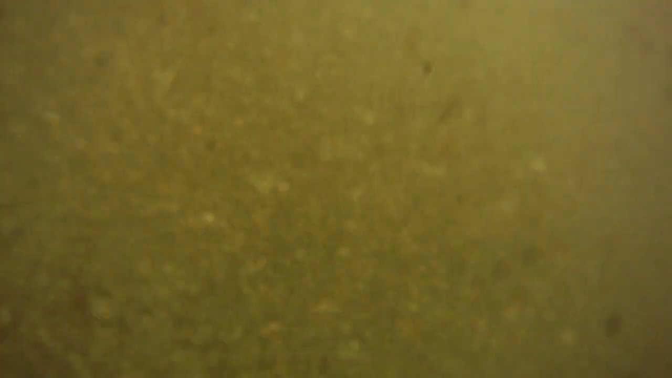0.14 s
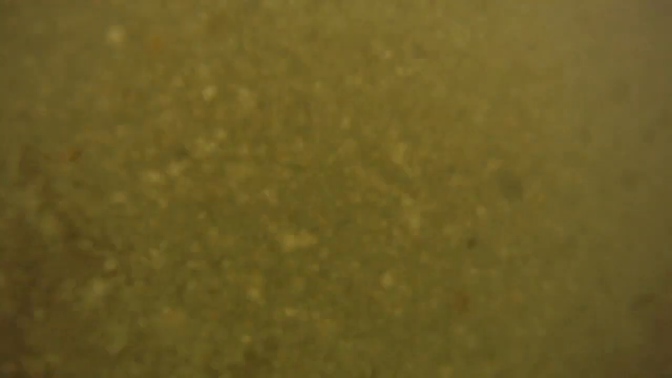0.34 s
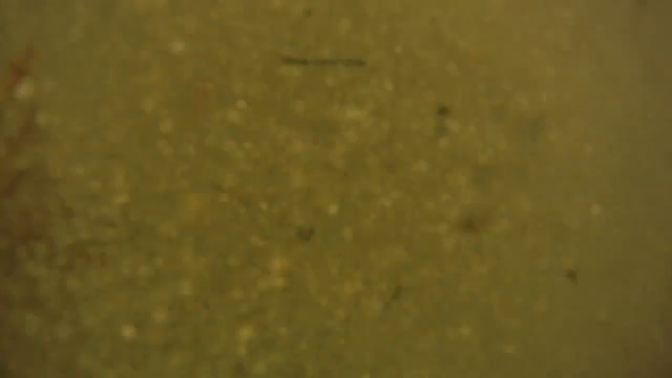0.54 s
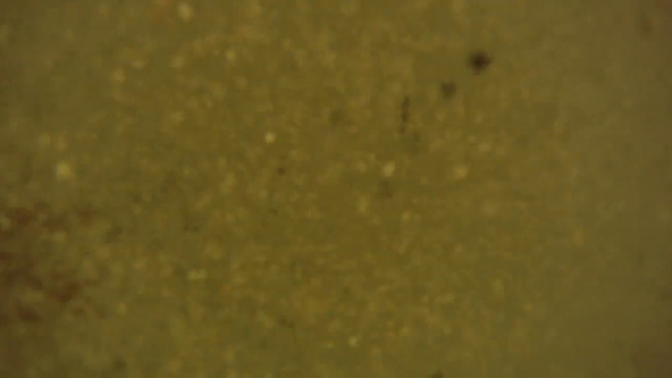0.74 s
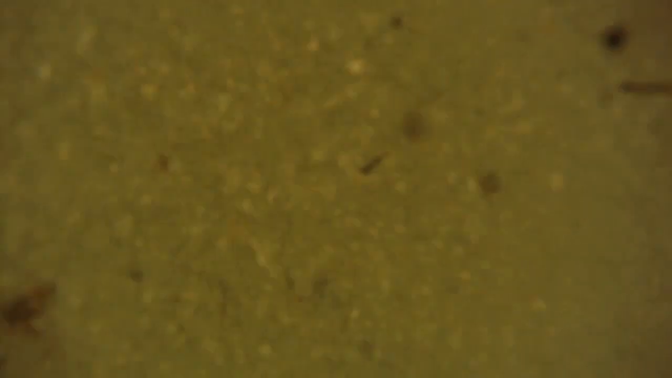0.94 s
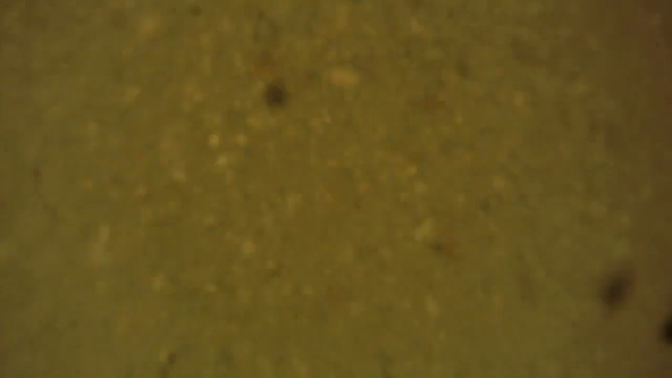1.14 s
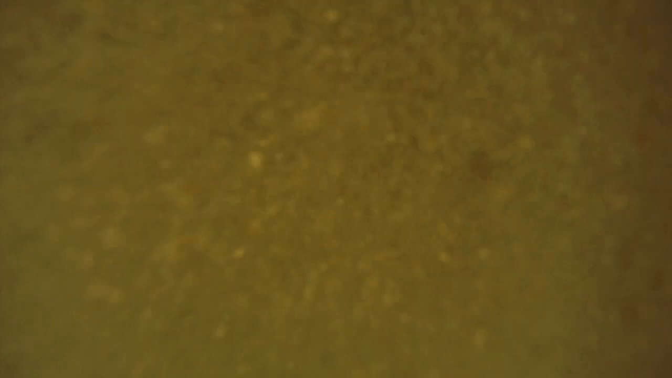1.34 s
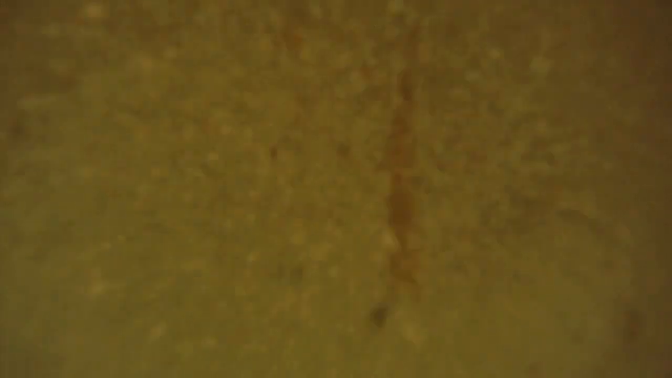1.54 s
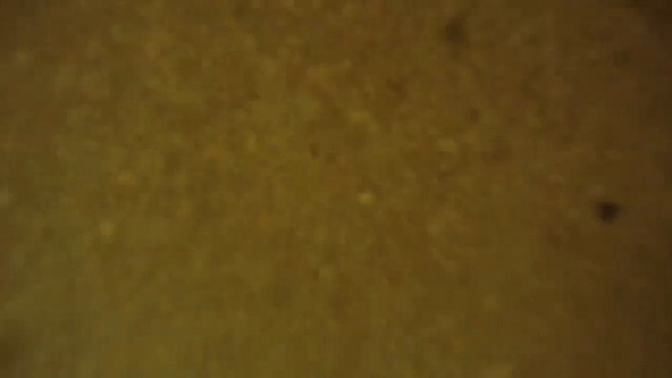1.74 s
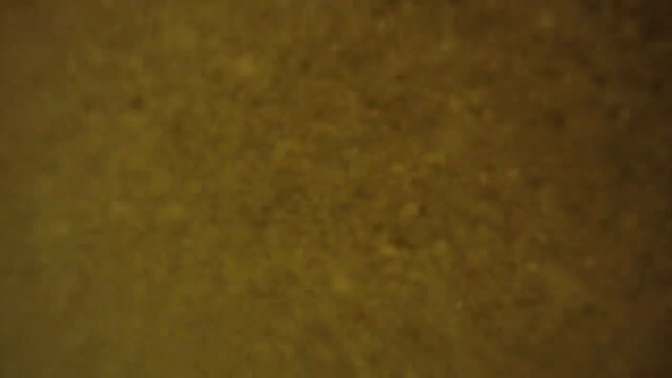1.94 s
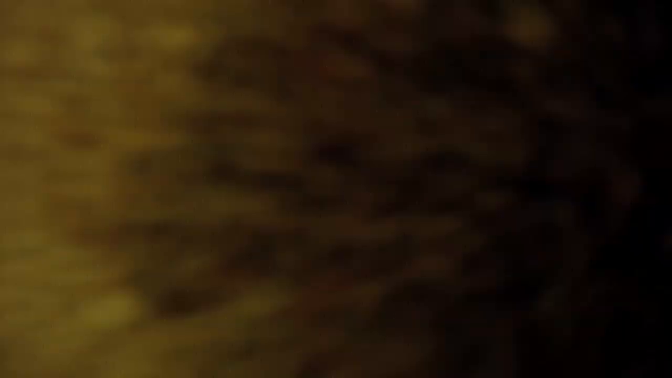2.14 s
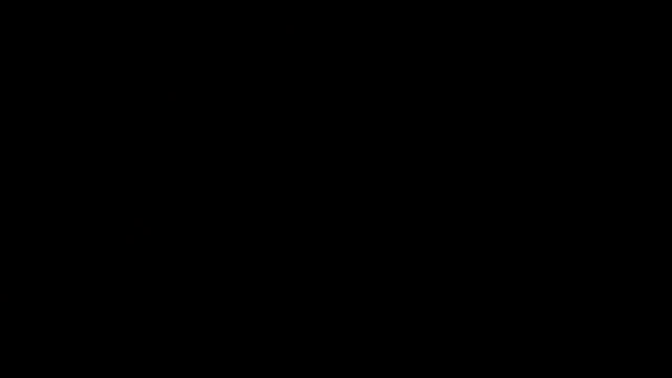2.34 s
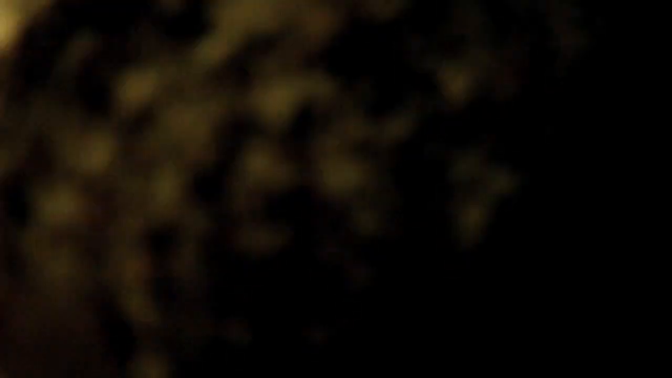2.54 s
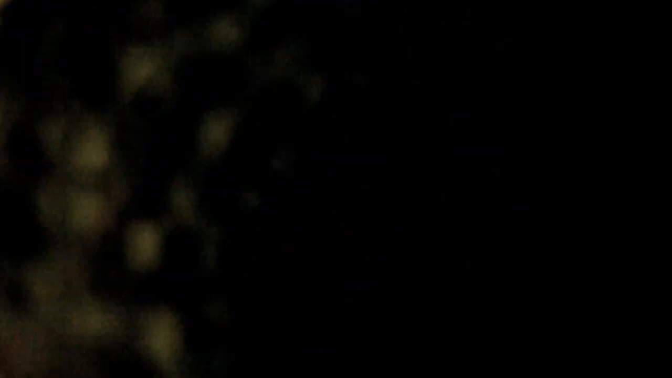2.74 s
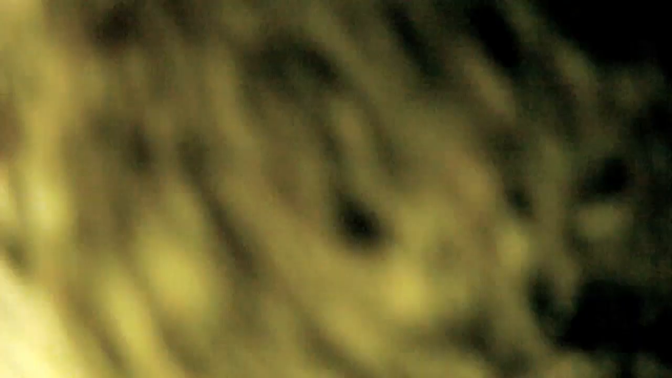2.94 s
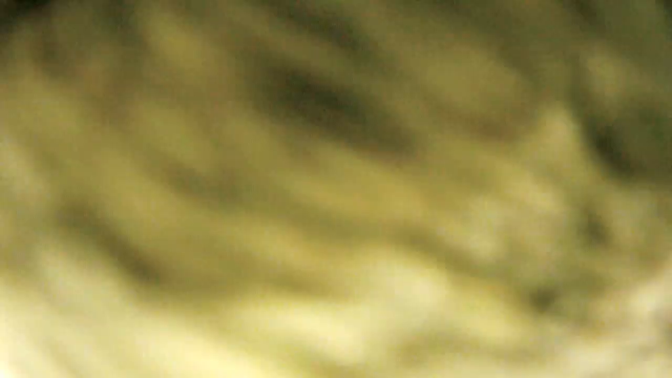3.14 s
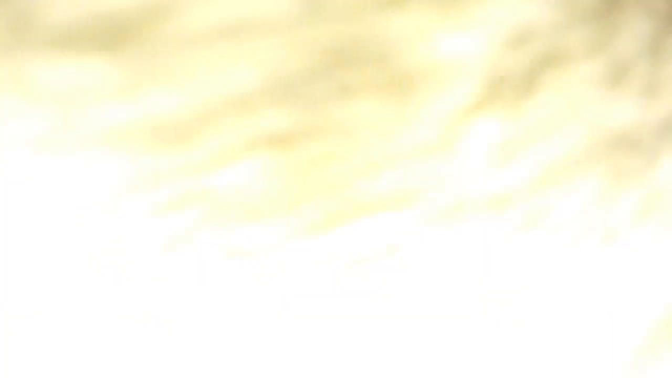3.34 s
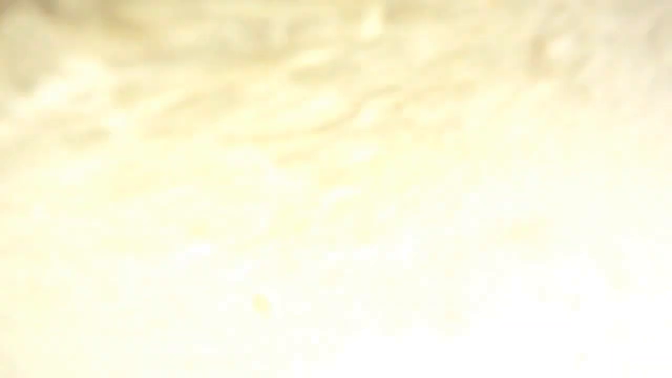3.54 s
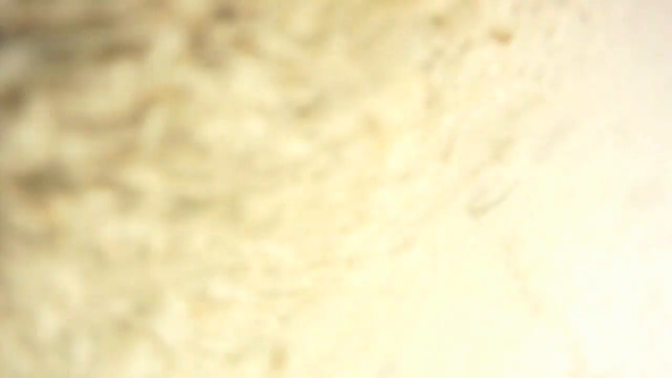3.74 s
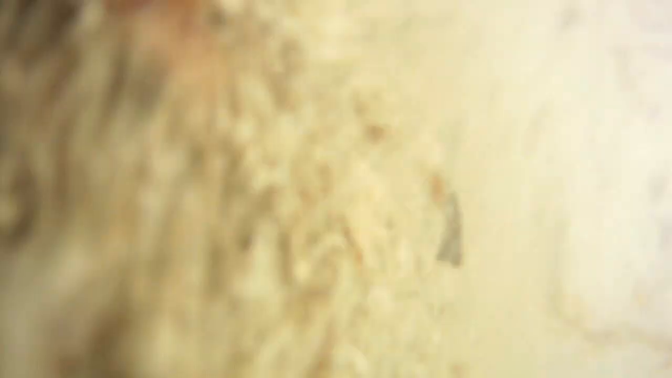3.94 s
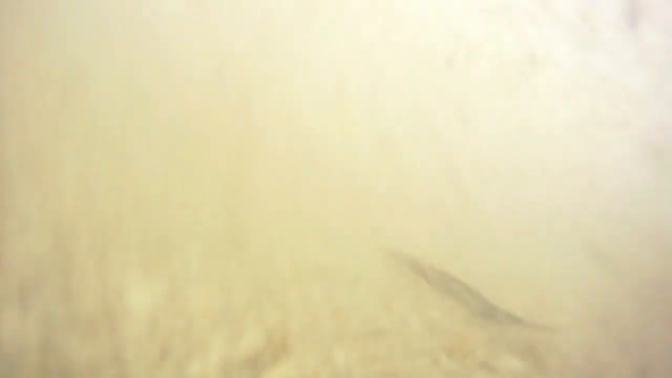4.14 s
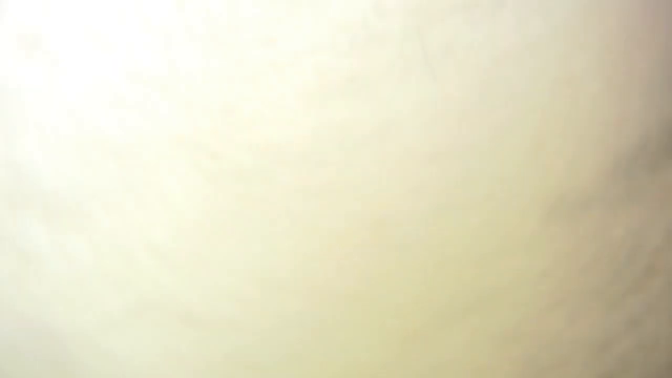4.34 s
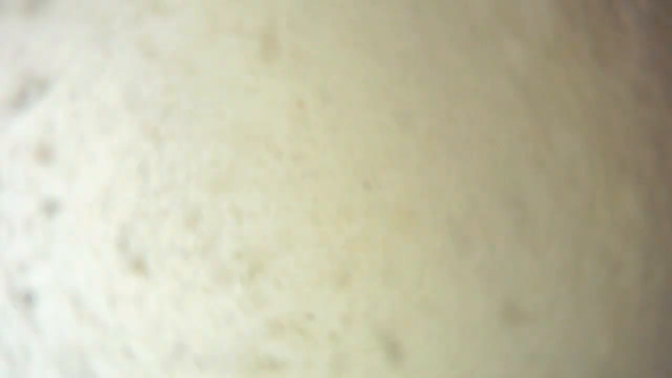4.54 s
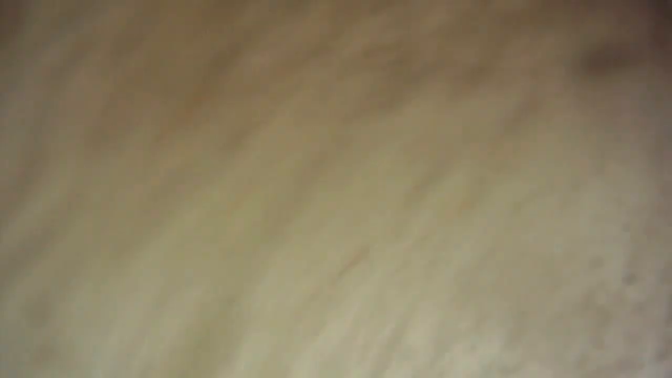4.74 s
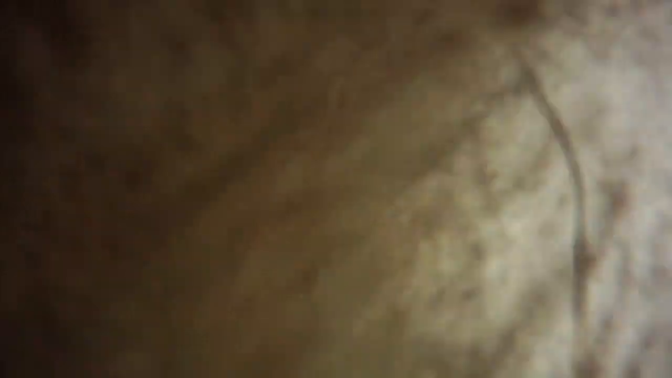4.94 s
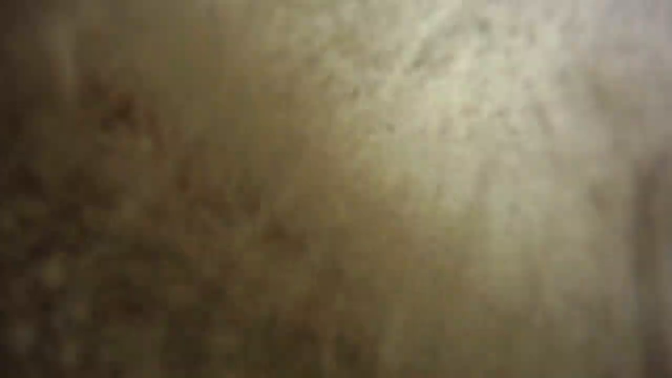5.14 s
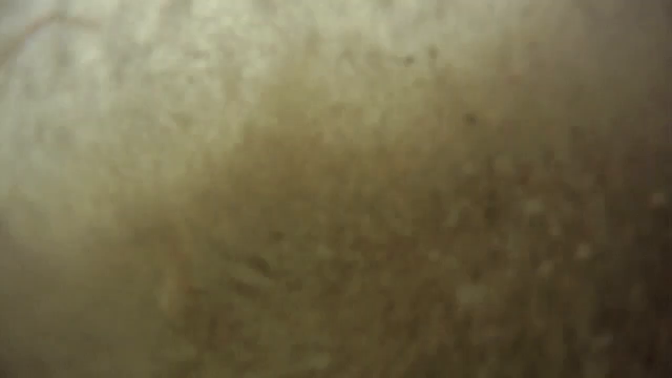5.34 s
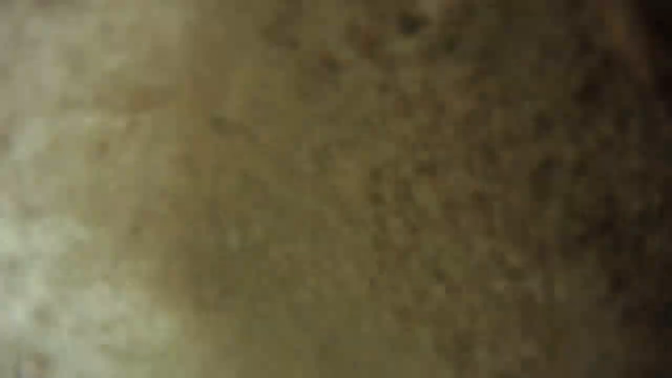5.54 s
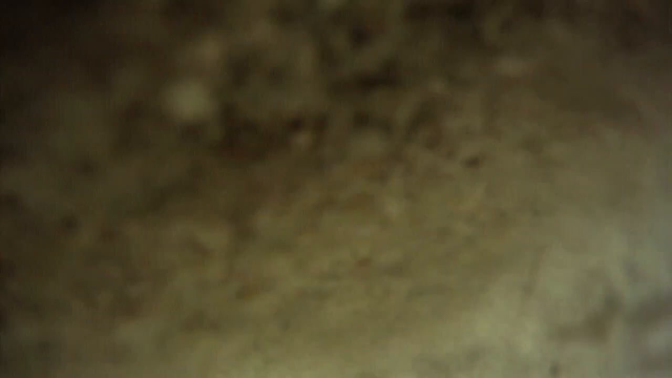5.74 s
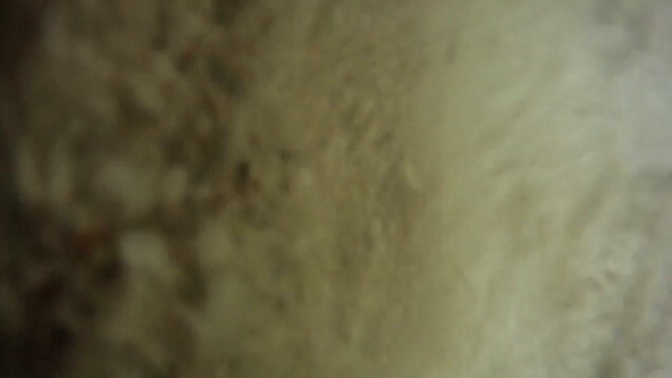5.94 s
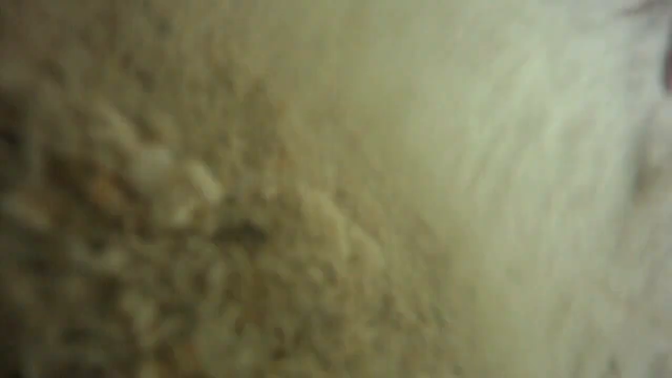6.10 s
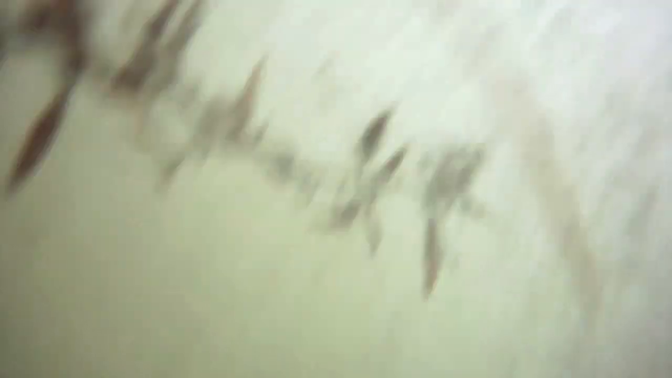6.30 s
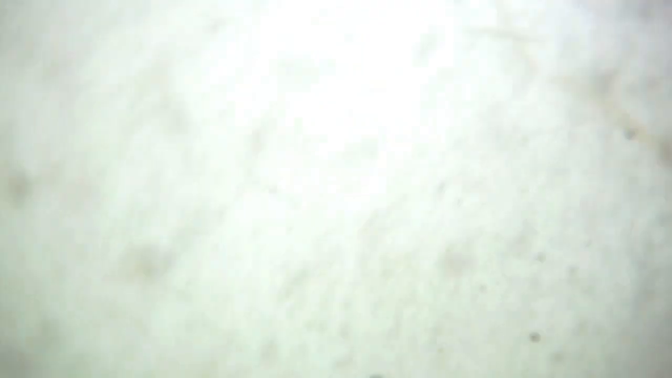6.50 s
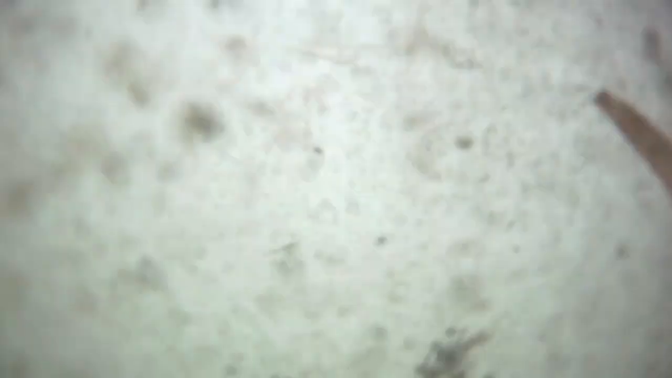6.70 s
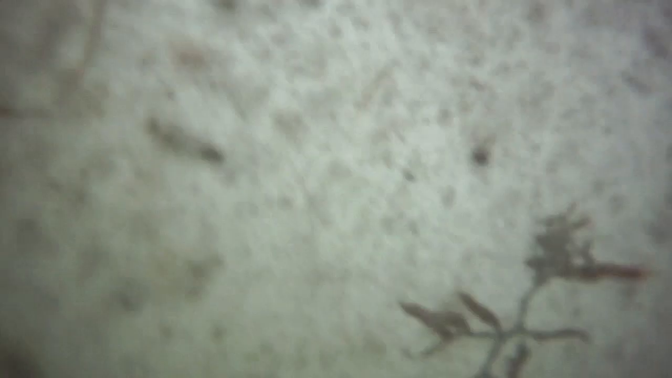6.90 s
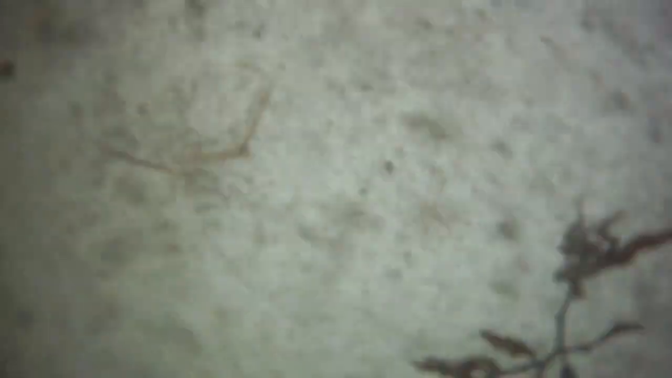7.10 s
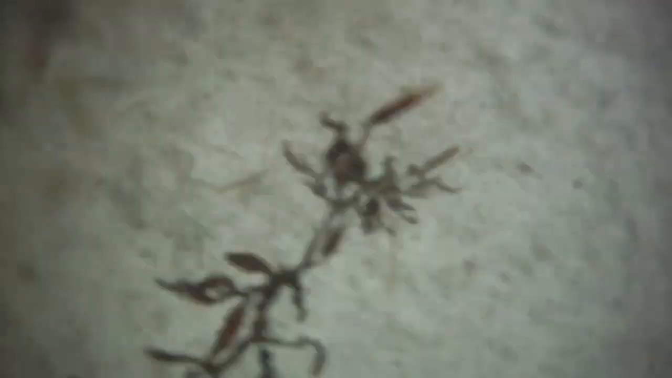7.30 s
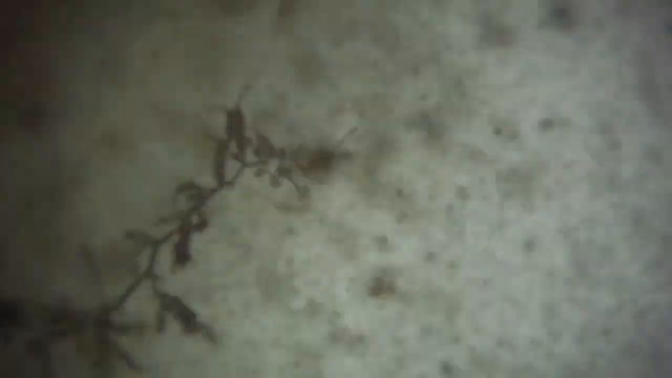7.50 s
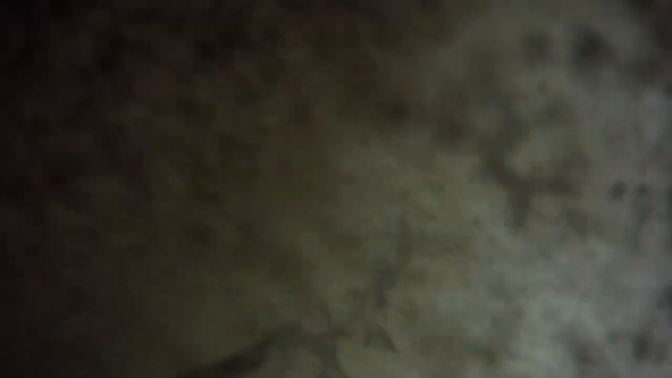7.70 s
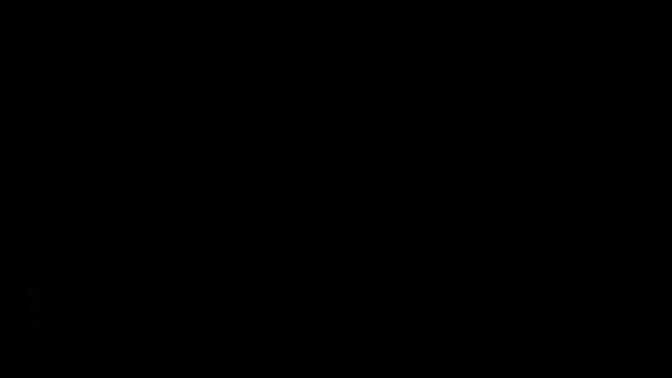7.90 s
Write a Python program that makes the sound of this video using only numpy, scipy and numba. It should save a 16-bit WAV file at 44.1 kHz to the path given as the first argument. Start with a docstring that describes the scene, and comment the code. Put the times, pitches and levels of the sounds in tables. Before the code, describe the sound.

Muffled underwater rumbling and gurgling as a plastic camera housing knocks and scrapes along sand in the surf.

```python
"""A waterproof camera housing knocks and grinds on the sand as it tumbles under the surf.
Impacts and sliding friction excite the resonant modes of its plastic shell, and grit ticks against it.
Turbulent water rumbles, gurgles and thumps through the wall; bubbles ring and fizz over a dull hiss.
The camera's gain control ducks after loud knocks, and its converter clips and holds each sample
at a low rate, which mirrors the spectrum into the treble."""
import sys
import numpy as np
from scipy import signal
from scipy.fft import rfft, irfft
from scipy.io import wavfile
from scipy.ndimage import uniform_filter1d
from numba import njit

SR = 44100
rng = np.random.default_rng(int(sys.argv[2]) if len(sys.argv) > 2 else 0)


def waveform_to_disk(signal):
    """Save audio, clipped to [-1, 1], as 16-bit WAV at the path in sys.argv[1]."""
    frames = np.transpose(np.atleast_2d(signal))
    scaled = np.clip(frames, -1, 1) * 32767
    samples = np.round(scaled).astype(np.int16)
    wavfile.write(sys.argv[1], SR, samples)


N = 355434

# turbulence round the housing: (time [s], rumble level [dB], gurgle level [dB])
WATER = [(0.0, -28.5, -30.5), (0.36, -26, -27), (0.8, -29.5, -36.5), (1.46, -39.5, -36), (2.11, -41, -35),
         (2.69, -43, -38), (2.99, -29, -36.5), (3.19, -40.5, -40.5), (3.61, -54, -40), (4.37, -47.5, -35.5),
         (4.67, -59, -43), (4.98, -60, -38.5), (5.36, -27, -29), (5.68, -42.5, -29), (6.04, -33, -33.5),
         (6.31, -38.5, -31), (6.44, -31, -22.5), (6.91, -25.5, -29), (7.02, -26.5, -25), (7.25, -39.5, -50),
         (7.56, -29, -25.5), (7.8, -31.5, -33.5), (8.06, -23, -24.5)]


def knocks():
    """Impact excitation: bursts of contact noise ring the shell and its air cavity; each push thuds."""
    # blows on the housing: (time [s], level [dB], 60 dB decay time [s], dull offset [dB], sharp offset [dB])
    blows = [(0.439, -29, .02, 0, -30), (0.523, -29, .022, -16, -27), (0.9028, -32, .03, -16, -32),
             (1.8197, -31.5, .019, -20, -10), (1.977, -36.5, .02, -22, -8), (2.218, 7, .01, -7, -1.5),
             (2.237, -6, 0.068, -6, -6), (2.5572, -39.5, .022, 4, -29), (2.858, -20, .019, 2, -6),
             (2.873, -14, 0.025, -2, -10), (2.898, -12, 0.013, -9, -13), (2.909, -21.5, .015, 7, -28),
             (3.0718, -12.5, 0.018, 4.5, -7), (3.122, -16, .016, -4, -11), (3.1625, -4.5, 0.011, -22, -9.5),
             (3.348, -12, 0.012, -23, 2.5), (3.362, -21, .022, -18, 4), (3.418, -3, 0.02, -24, -8.5),
             (3.4461, -1, .028, -3.5, -9), (3.489, -9.5, 0.016, -20, 7.5), (3.496, -0.5, .022, -30, -5),
             (3.5346, -9.5, 0.019, -0.5, 5.5), (3.541, 10, 0.018, -17, -2), (3.589, -17, 0.026, -1, -2),
             (3.6918, -20.5, 0.038, -2, -1), (3.985, 6, 0.011, -8, -36), (4.0128, 0.5, 0.02, -10, -18),
             (4.0226, -2, .038, -10, -5.5), (4.0834, 5, 0.03, -5.5, -1), (4.154, -18, .022, -18, -10),
             (4.207, -10, 0.04, -31, -6), (4.2238, 4.5, 0.02, -15.5, -16), (4.251, -7, .028, -8, -26),
             (4.484, -8.5, 0.015, -21, -16), (4.5082, 10, 0.03, -13.5, -35),
             (4.6257, -7.5, 0.018, -9.5, -9.5), (4.829, -16, 0.026, -11, -24), (5.043, 7, 0.016, -11, -6.5),
             (5.0523, 3, .028, -16, -7), (5.0599, -3, 0.0094, -11, 10), (5.311, -17, .022, -25, -18),
             (5.3342, -3.5, 0.033, -10, -10), (5.366, -0.5, 0.016, -10, -14), (5.4007, -15, .03, -30, -25),
             (5.4618, -3.5, 0.06, -4, -4.5), (5.5804, -13, 0.0095, -15, -15),
             (5.6195, -20.5, 0.012, -7, -17), (5.6446, -21, 0.011, -7, -21), (5.736, 16.5, 0.01, -6.5, -25),
             (5.803, 2, 0.048, -2.5, -6), (5.9049, -12.5, 0.042, 0, -14), (5.939, -11, 0.035, -1, -6),
             (5.9853, -3.5, 0.018, -9.5, -19), (6.0674, -4, 0.031, -16, -4.5), (6.1019, 1.5, 0.052, -7, -7),
             (6.5148, -22.5, .019, -5, -2), (6.6172, -4, 0.03, -6.5, -2), (6.652, 12.5, .0095, -30, -36),
             (6.8937, -29, 0.025, -2, -4.5), (6.9332, -9.5, 0.026, -6.5, 2.5),
             (7.008, 6, .013, -22.5, -2.5), (7.0529, 4.5, 0.023, 10.5, -2), (7.0559, 12.5, 0.016, -17, -30),
             (7.1934, 10, 0.012, 3, -12), (7.2095, -5.5, 0.025, 3, -20), (7.269, 4.5, 0.013, -3, -6),
             (7.2837, 0.5, .012, -4.5, -7.5), (7.4183, -13.5, 0.032, -4, -7),
             (7.8227, -2.5, 0.014, -10, -1), (7.994, -4.5, 0.13, -9.5, -6)]
    rise_s, thud_db = 0.002, -8.5
    drive, push, t = np.zeros((3, N + SR)), np.zeros(N + SR), np.arange(SR // 4) / SR
    for s, db, t60, dull_db, sharp_db in blows:
        envelope = np.minimum(t / rise_s, 1) * np.exp(-np.log(1000) * np.maximum(t - rise_s, 0) / t60)
        drive[:, int(s * SR):][:, :len(t)] += undb(db + np.array([[dull_db], [0], [sharp_db]])) * envelope
        push[int((s + rise_s) * SR)] += undb(db + dull_db + thud_db)
    drive[[0, 2]] *= undb([[5.0], [8.0]])  # blows reach the dull and sharp modes better than sliding does
    crunch = np.sign(rng.standard_normal(N)) * drive[:, :N]
    ring = shell(*crunch, damping=1.9)
    cavity = signal.lfilter(*signal.iirpeak(870, 2.5, fs=SR), crunch[0])
    thud = np.sin(2 * np.pi * 600 * t) * np.exp(-t / 0.0018)
    return undb(-6.5) * ring + undb(0.5) * cavity + signal.fftconvolve(push, thud)[:N]


def sand(parts_db):
    """Stick-slip friction: dense grains scratch the shell; each group of modes also flickers alone."""
    scratch = unit(0.95 * rng.standard_normal(N) + unit(grains(rate=1300, spread_db=6, top_db=7.5)))
    scratch = scratch * undb(1.32 * walk(60) + 0.37 * walk(260))
    return shell(*(scratch * undb(db + 1.24 * walk(45)) for db in parts_db), damping=1)


def contact():
    """Incoherent addition: slides and drift sum in power to dull, body and sharp friction levels in dB."""
    # sand drifting past the shell: (time [s], level [dB])
    drift = [(0.0, -59.5), (1.4, -64.5), (2.2, -69.5), (2.3, -41.5), (2.42, -53.5), (2.6, -59),
             (2.82, -48.5), (3.3, -37), (3.96, -36.5), (4.12, -41), (4.45, -42), (4.9, -56.5), (5.25, -44),
             (5.6, -60), (6.05, -53), (6.5, -41.5), (6.65, -54.5), (6.92, -58), (7.25, -34), (7.56, -54.5),
             (7.8, -62), (8.06, -46)]
    # slides over the sand: (time of full contact [s], rise [s], hold [s], fall [s], level [dB],
    # dull offset [dB], sharp offset [dB])
    slides = [(0.318, 0.25, 0.054, 0.42, -48, 3, -5.5), (0.55, 0.4, .04, 0.28, -49, -9, -9),
              (0.922, 0.041, 0.1, .5, -55, 1, -17), (2.212, 0.015, 0.073, 0.061, -24.5, 3.5, 0),
              (2.948, 0.13, 0.046, .055, -27.5, 7, -6), (3.077, 0.09, .002, 0.023, -31, 9, 0),
              (3.358, 0.18, 0.024, .1, -33, 6.5, 7), (3.427, 0.032, 0.13, 0.045, -21, 6, -1),
              (3.6, 0.11, 0.065, 0.41, -41, 5, 4), (3.861, 0.18, .005, 0.21, -28.5, 3.5, -1),
              (4.086, 0.087, .008, 0.021, -11.5, 6.5, 0), (4.157, .03, .03, .1, -31, -12, -4),
              (4.203, 0.093, 0.055, 0.11, -24, -0.5, -2.5), (4.333, 0.12, 0.0054, 0.14, -17, 3, -0.5),
              (4.486, .005, 0.025, 0.056, -19, -3, -1.5), (4.527, 0.018, 0.11, 0.062, -26.5, 3, 1),
              (5.051, 0.0073, .002, 0.021, -9.5, 8.5, -10), (5.059, .01, 0.065, 0.15, -23.5, 3.5, 2),
              (5.314, 0.037, 0.097, .05, -20.5, -5, -3), (5.472, 0.13, .002, 0.094, -19, 2, 0.5),
              (5.677, 0.028, .002, 0.094, -22, 1, -6), (5.743, 0.21, .002, 0.034, -28.5, -4, 1.5),
              (5.806, 0.013, .002, 0.084, -12, 5, 1.5), (5.87, .02, .07, .05, -36.5, -3, 0),
              (5.952, 0.032, .002, .09, -27.5, 7, 3), (6.107, 0.01, 0.2, 0.19, -18.5, 2, 1.5),
              (6.951, .03, 0.29, 0.3, -27.5, 3.5, 2), (7.274, .06, .002, 0.12, -25.5, 10, 4.5),
              (7.335, 0.029, .08, .05, -35, 6, 7.5), (7.479, .02, 0.031, 0.082, -42, 3, 7.5),
              (7.428, 0.11, 0.018, 0.068, -27, 3.5, 4.5), (7.886, 0.06, 0.022, 0.044, -13.5, 5.5, 0.5),
              (8.007, 0.065, 0.045, .05, -27.5, 4, 3.5)]
    edge_db, sag_db_per_s = 35.5, 22  # range of a rise or fall; weakening while held
    t = np.arange(0, N + 32, 32) / SR
    power = np.tile(undb(2 * np.interp(t, *np.transpose(drift))), (3, 1))
    power[2] *= undb(2 * -0.5)  # drift drives the sharp modes 0.5 dB less
    for s, rise, hold, fall, db, dull_db, sharp_db in slides:
        age = t - s
        edges = np.maximum(-age, 0) / rise + np.maximum(age - hold, 0) / fall
        loss_db = edge_db * edges + sag_db_per_s * np.clip(age, 0, hold)
        power += undb(2 * (db + np.array([[dull_db], [0], [sharp_db]]) - np.minimum(loss_db, 200)))
    return [np.interp(np.arange(N) / SR, t, 10 * np.log10(p)) for p in power]


def shell(dull, body, sharp, damping):
    """Modal superposition: three drives each ring a group of modes; contact damping widens them all."""
    # housing modes: (frequency [Hz], bandwidth at damping 1 [Hz], relative gain [dB],
    # group [0 dull, 1 body, 2 sharp])
    modes = [(828, 110, -15, 0), (1430, 170, -8.5, 0), (1802, 165, -5.5, 1), (2097, 172, 0, 1),
             (2555, 433, -9, 1), (3439, 351, -9, 2), (3740, 296, -9, 2), (4280, 304, -17.5, 2),
             (5414, 380, -16.5, 2)]
    out = 0
    for k, (hz, width, db, group) in enumerate(modes):
        drive = (dull, body, sharp)[int(group)]
        resonator = signal.iirpeak(hz, hz / (width * damping), fs=SR)
        out = out + (-1) ** k * undb(db) * signal.lfilter(*resonator, drive)
    return out / np.sqrt(damping * modes[3][1] / SR)  # scaled by the strongest mode's bandwidth


def water():
    """Transmission through a wall: the housing filters eddy and bubble noise; three bands flicker apart."""
    # response of the housing to the water: (frequency [Hz], gain [dB])
    transmission = [(15, -76), (25, -3), (81, -8), (115, -2), (151, -0.5), (220, 1.5), (259, -2), (330, -8),
                    (465, -6.5), (609, -3.5), (647, -1.5), (697, -12.5), (900, -29.5), (1170, -53),
                    (1980, -120)]
    rumble_db, gurgle_db = curves(WATER)
    surge_db = -36.5 + 0.29 * rumble_db  # the deep swell follows the rumble weakly
    stir = rng.standard_normal(N) + 0.63 * unit(grains(rate=150, spread_db=0, top_db=12))
    surge, rumble, gurgle = split(colour(stir, transmission), low_hz=88, high_hz=330)
    rocking = signal.lfilter(*signal.iirpeak(158, 9, fs=SR), rumble)
    rumble = unit(rumble) + 0.43 * unit(rocking)
    return (unit(surge) * undb(surge_db + 2.3 * walk(14))
            + unit(rumble) * undb(rumble_db + 0.74 * walk(20))
            + unit(gurgle) * undb(gurgle_db + 2.58 * walk(30)))


def bubbles():
    """Bubble resonance: each rings as a fading sine that glides up; larger, lower ones ring longer."""
    # large bubbles: (time [s], peak level [dB], starting frequency [Hz])
    large_bubbles = [(0.239, -12.5, 141), (0.387, -20, 432), (0.479, -18, 393), (0.839, -25, 153),
                     (1.384, -23.5, 580), (1.429, -26.5, 544), (1.485, -12.5, 534), (1.546, -19.5, 616),
                     (1.709, -26, 445), (1.749, -28, 420), (1.984, -20, 624), (2.009, -24, 590),
                     (2.163, -26, 179), (2.287, -19, 537), (2.922, -23, 147), (3.071, -17.5, 575),
                     (3.61, -29, 620), (3.772, -22, 510), (4.217, -15, 582), (4.393, -28, 520),
                     (4.72, -26, 638), (5.221, -25, 641), (5.453, -12.5, 205), (5.501, -12.5, 624),
                     (5.652, -13, 308), (5.907, -19.5, 314), (6.419, -18, 606), (6.518, -19, 127.4),
                     (6.538, -14, 211), (6.697, -20, 112), (6.837, -11.5, 583), (6.859, -21, 185),
                     (7.831, -11, 255)]
    out = np.zeros(N + SR)
    for s, peak_db, hz in large_bubbles:
        add_ring(out, s, hz, peak_db, rise=0.0025, t60=0.035 + 7 / hz, glide=0.1)
    return out[:N]


def thumps():
    """Heavily damped oscillation: a slap of water shoves the whole housing for a cycle or two."""
    # slaps of water: (time [s], peak level [dB], frequency [Hz])
    slaps = [(2.213, -17.5, 130), (2.295, -19.5, 45), (3.073, -16.5, 90), (3.541, -33, 70),
             (4.33, -26, 110), (4.5, -21.5, 120), (5.045, -22, 55), (5.46, -24, 70), (5.735, -24, 70),
             (7.19, -23, 70), (7.805, -18, 45), (7.9, -17, 50)]
    out = np.zeros(N + SR)
    for s, peak_db, hz in slaps:
        add_ring(out, s, hz, peak_db, rise=0.003, t60=3.3 / hz, glide=0)
    return out[:N]


def fizz(sand_db, count=2000):
    """Free vibration: tiny bubbles and grit ping at random, following the sand's level within limits."""
    out, t = np.zeros(N + SR), np.arange(SR // 50) / SR
    stir_db = np.clip(sand_db, -66, -44)
    for when, pitch, length, faintness in rng.random((count, 4)):
        start, hz = int(when * N), 950 * 5.2 ** pitch
        cycles = 3.1 + 14 * length
        age = hz * t / cycles
        ping = np.sin(2 * np.pi * hz * t * (1 + 0.018 * age)) * age * np.exp(-3.5 * age)
        db = stir_db[start] + 27.5 - 9 * pitch - 2.8 * np.log(faintness + 0.067)
        out[start:][:len(t)] += undb(db) * ping
    return out[:N]


def ticks():
    """Impulse response: a single grain striking the lens port rings for a few fast-fading cycles."""
    # strikes of grit: (time [s], level [dB], frequency [Hz])
    strikes = [(0.8754, -50, 5200), (1.1223, -44, 4940), (1.1494, -53, 3870), (1.1722, -54, 4500),
               (1.239, -35, 3700), (1.3544, -60, 3650), (1.4691, -57, 3560), (1.4995, -45, 3400),
               (1.5369, -43, 5080), (1.6167, -46, 3680), (1.7434, -54, 3690), (2.0794, -57, 3590)]
    out, t = np.zeros(N), np.arange(SR // 100) / SR
    for s, db, hz in strikes:
        out[int(s * SR):][:len(t)] += undb(db) * np.sin(2 * np.pi * hz * t) * np.exp(-t / 0.0016)
    return out


def wash(sand_db):
    """Flow noise: stirred water further off gives a dull hiss that follows the sand or the gurgle."""
    _, gurgle_db = curves(WATER)
    stir_db = np.maximum(np.clip(sand_db, -67, -47), gurgle_db - 27)
    band = signal.butter(1, [900, 1700], "band", fs=SR, output="sos")
    hiss = signal.sosfilt(band, rng.standard_normal(N))
    return unit(hiss) * undb(stir_db - 2 + 1.4 * walk(25))


def add_ring(out, s, hz, peak_db, rise, t60, glide):
    """Damped oscillator: adds at time s a sine that swells and fades; glide raises its pitch."""
    t = np.arange(SR // 4) / SR
    envelope = (1 - np.exp(-t / rise)) ** 2 * np.exp(-np.log(1000) * t / t60)
    tone = np.sin(2 * np.pi * hz * t * (1 + glide * t / t60))
    out[int(s * SR):][:len(t)] += undb(peak_db) * tone * envelope / envelope.max()


def grains(rate, spread_db, top_db):
    """Shot noise: random clicks, rate a second, each boosted by a random amount up to top_db."""
    size_db = np.minimum(spread_db * rng.exponential(size=N), top_db)
    return (rng.random(N) < rate / SR) * rng.standard_normal(N) * undb(size_db)


def walk(rate):
    """Random modulation: ramps between rate random values a second, at unit RMS."""
    step = int(SR / rate)
    held = np.repeat(rng.standard_normal(N // step + 1), step)
    return unit(uniform_filter1d(held, step)[:N])


def colour(x, points, size=4096):
    """Minimum-phase filter through (frequency [Hz], gain [dB]) points, from the folded cepstrum."""
    hz, db = np.transpose(points)
    bin_hz = np.arange(size // 2 + 1) * SR / size
    gain_db = np.interp(np.log(bin_hz + 1), np.log(hz), np.maximum(db, -80))
    cepstrum = irfft(gain_db * np.log(10) / 20)
    cepstrum[1:size // 2] *= 2
    cepstrum[size // 2 + 1:] = 0
    return signal.fftconvolve(x, irfft(np.exp(rfft(cepstrum))))[:N]


def split(x, low_hz, high_hz):
    """Crossover: low, middle and high bands."""
    edges = (low_hz, "low"), ([low_hz, high_hz], "band"), (high_hz, "high")
    return [signal.sosfilt(signal.butter(4, hz, kind, fs=SR, output="sos"), x) for hz, kind in edges]


def curves(table):
    """Linear interpolation of a table's columns over time, one value a sample."""
    s, *columns = np.transpose(table)
    return [np.interp(np.arange(N) / SR, s, column) for column in columns]


def undb(db):
    """Decibels to amplitude."""
    return 10 ** (np.asarray(db) / 20)


def unit(x):
    """Normalisation to unit RMS."""
    return x / np.sqrt(np.mean(x ** 2))


@njit
def follow(x, attack_s, release_s):
    """Envelope detection: the rectified signal is smoothed with separate rise and fall times."""
    level, out = 0., np.empty(len(x))
    for i in range(len(x)):
        lag_s = attack_s if abs(x[i]) > level else release_s
        level += (abs(x[i]) - level) / (lag_s * SR)
        out[i] = level
    return out


def scene():
    """Superposition: water and contact sounds add in one channel."""
    parts_db = contact()
    body_db = parts_db[1]
    surf = water() + thumps() + bubbles() + fizz(body_db) + wash(body_db)
    return (surf + ticks() + sand(parts_db) + knocks())[None]


def record(dry):
    """Compression ducks after peaks, the converter clips, and sample-and-hold makes spectral images."""
    threshold_db, hold_hz, top_hz = -12, 12000, 15250
    level = follow(dry[0], attack_s=0.0022, release_s=0.056)
    ducked = dry[0] * np.minimum(1, undb(threshold_db) / (level + 1e-9)) ** 0.5  # 2:1 ratio
    smooth = signal.sosfilt(signal.butter(6, 5400, fs=SR, output="sos"), ducked)  # anti-alias filter
    clipped = np.clip(signal.resample_poly(smooth, hold_hz, SR), -.85, .85)
    held = signal.resample_poly(np.repeat(clipped, 4), SR, 4 * hold_hz)[:N]
    return signal.sosfilt(signal.ellip(12, .2, 90, top_hz, fs=SR, output="sos"), held)[None]


dry = scene()
out = record(dry)
waveform_to_disk(out)
```